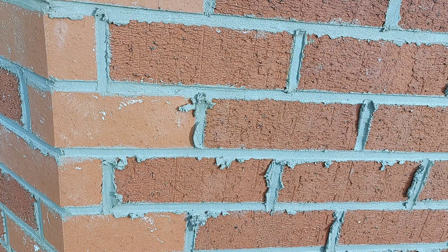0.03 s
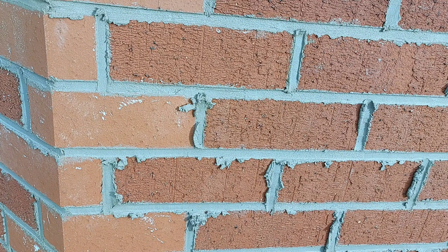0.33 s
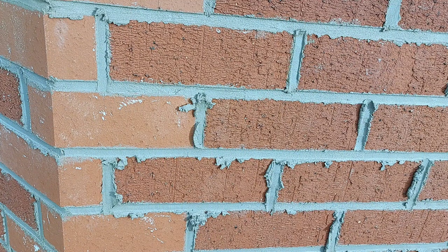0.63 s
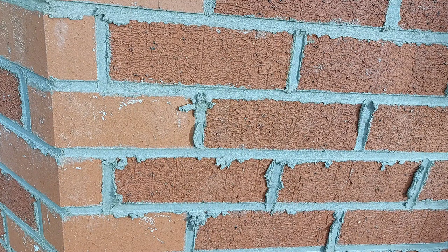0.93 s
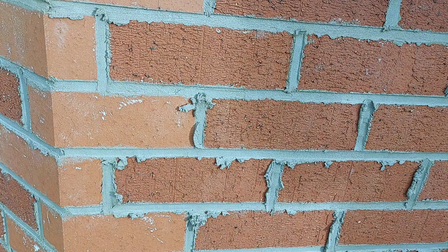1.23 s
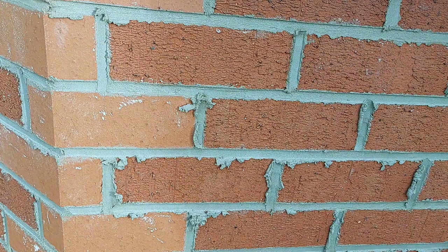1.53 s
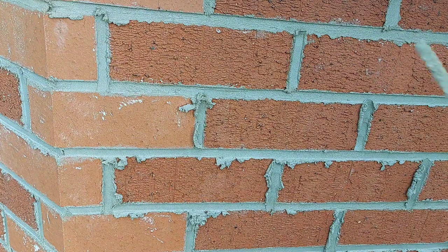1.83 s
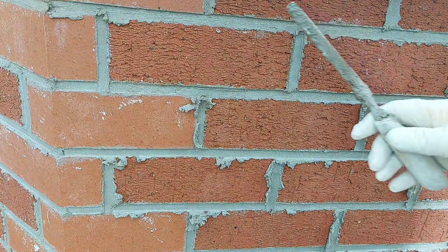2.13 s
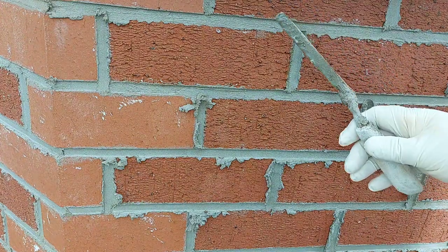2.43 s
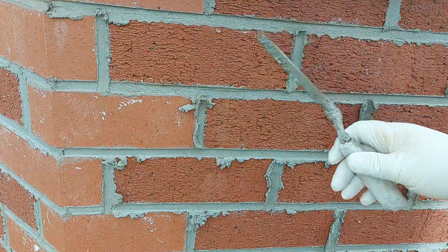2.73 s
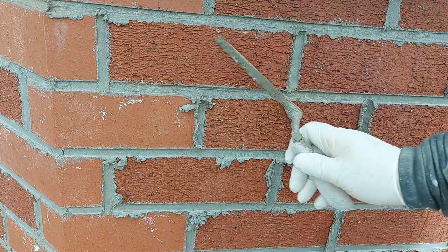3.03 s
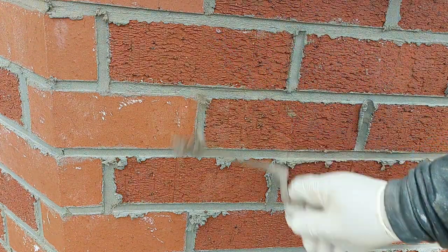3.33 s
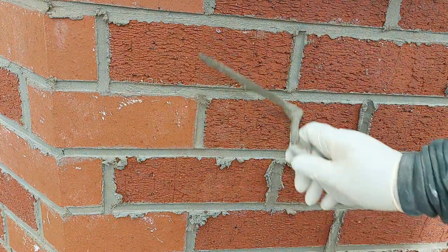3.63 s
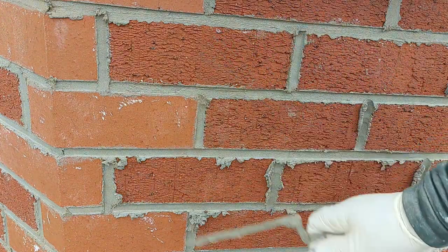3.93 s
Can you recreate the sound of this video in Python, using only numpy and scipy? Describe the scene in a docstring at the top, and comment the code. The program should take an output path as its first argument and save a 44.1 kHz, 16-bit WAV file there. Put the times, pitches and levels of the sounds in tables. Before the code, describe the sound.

Short trowel scrapes along damp mortar, then harder, ringing ones over brick.

```python
"""Outdoors at a brick wall, a steel pointing trowel works the joints, close to a hand-held camera.
Three short strokes cut through damp mortar, then two harder ones drag over brick and set the blade ringing.
Sand grains breaking under the edge make the hiss and shake the steel; bigger grains catch the tip and tick.
Soft handling bumps and faint cloth rubbing come in between, over a low rumble and a distant machine's hum."""
import sys
import numpy as np
from scipy import signal
from scipy.fft import rfft, irfft
from scipy.io import wavfile
from scipy.ndimage import map_coordinates

SR = 44100
rng = np.random.default_rng(int(sys.argv[2]) if len(sys.argv) > 2 else 0)


def pcm_store(signal):
    """Save signal as 16-bit PCM."""
    levels = np.round(np.clip(np.atleast_2d(signal), -1, 1) * 32767)
    wavfile.write(sys.argv[1], SR, levels.astype(np.int16).T)


N = 176400
TIME = np.arange(N) / SR
FREQS = np.fft.rfftfreq(N, 1 / SR)
# How much later the left microphone hears each sound
MORTAR_LAG_MS, BRICK_LAG_MS, HANDLING_LAG_MS, OUTDOOR_LAG_MS = 0.471, 0.026, .33, 0.22


def amp(db):
    """Turns decibels into a gain."""
    return 10 ** (np.asarray(db) / 20)


def unit(x):
    """Scales a signal to an average power of 1."""
    return x / np.sqrt(np.mean(x ** 2) + 1e-20)


def read(points, hz):
    """Looks up a table by frequency, on a log scale."""
    f, value = np.transpose(points)
    return np.interp(np.log(hz + 1), np.log(f + 1), value)


def level(curve, column=1):
    """One dB column of a curve as a gain over time, silent outside it."""
    rows = np.array(curve)
    return amp(np.interp(TIME, rows[:, 0], rows[:, column], left=-150, right=-150))


def colour(x, tone):
    """Shapes the lows and highs, keeping the power of white noise."""
    return irfft(rfft(x) * unit(amp(read(tone, FREQS))), N)


def wander(hz):
    """A smooth random wobble, up to about the given rate."""
    return unit(irfft(rfft(rng.standard_normal(N)) / (1 + (FREQS / hz) ** 4), N))


def solo(x):
    """Pairs a signal with silence, so stereo() sends one version to both sides."""
    return np.array([x, np.zeros(N)])


# How alike left and right are (frequency [Hz], likeness [0 to 1])
CLOSE_LIKENESS = [(30, 0.46), (250, 0.58), (600, 0.45), (1500, 0.61), (3000, 0.24), (16000, 0.2)]  # nearby sounds
ALL_ROUND_LIKENESS = [(30, 0.91), (180, 0.99), (400, 0.71), (1400, 0.47), (2500, 0.06), (16000, 0.05)]  # sounds from all round
BRICK_LIKENESS = [(300, 0.44), (4600, 0.543), (6000, 0.19)]  # steel on brick
# Which side is louder (frequency [Hz], left minus right [dB])
MAIN_BALANCE = [(30, -3), (300, -4.5), (1200, -5), (3000, -5), (5000, -6.5), (7000, -8.5), (9000, 2),
                (12500, -11), (16000, -7.5)]
BRICK_BALANCE = [(300, -4), (2000, -2), (3200, -6), (4600, -5), (7000, -3.5), (8500, 2.5), (12000, -2),
                 (16000, -0.5)]
def stereo(pair, lag_ms, likeness=CLOSE_LIKENESS, balance=MAIN_BALANCE):
    """Spreads two unrelated versions of a sound over the two microphones."""
    a, b = rfft(pair)
    same = np.clip(read(likeness, FREQS), 0, 1)
    mid, side = a * np.sqrt((1 + same) / 2), b * np.sqrt((1 - same) / 2)
    lean = amp(read(balance, FREQS) / 2)
    delay = np.exp(-2j * np.pi * FREQS * lag_ms / 1000)
    return irfft(np.array([(mid + side) * lean * delay, (mid - side) / lean]), N)


def ring(pair, notes):
    """Shakes an object so its own notes ring; a fade time is how long one takes to drop 60 dB."""
    t = np.arange(SR // 4) / SR
    body = 0
    for k, (hz, db, fade_s) in enumerate(notes):
        note = amp(-60 * t / max(fade_s, .003)) * np.sin(2 * np.pi * hz * t)
        body += (-1) ** k * amp(db) * unit(note)
    return signal.fftconvolve(pair, body[None] / np.linalg.norm(body), axes=1)[:, :N]


def grit(grains_per_s=5000, spread_db=3.5, slip_db=2, slip_hz=166):
    """Sand grains of uneven size break in clumps as the edge sticks and slips."""
    size = amp(spread_db * np.minimum(rng.exponential(1, N), 4))
    breaks = rng.random(N) < grains_per_s / SR
    clicks = rng.choice([-1., 1.], (2, N)) * size * breaks
    return unit(clicks * amp(slip_db * wander(slip_hz)))


# Tone of the rumble (frequency [Hz], relative level [dB])
RUMBLE_TONE = [(20, -47), (30, -34.5), (43, -9), (60, -6), (116, -1), (190, -10.5), (240, -8.5), (330, -21),
               (480, -28), (1060, -31.5), (1500, -38), (2100, -49), (3200, -58), (12400, -58),
               (16000, -64.5)]
# How loud the rumble and the machine are (time [s], level [dB])
RUMBLE_LEVELS = [(0, -50.5), (.3, -44), (.42, -50), (.7, -48), (1.2, -46), (2.6, -45), (3.2, -46.5),
                 (3.45, -41.5), (3.6, -43.5), (4, -42)]
MACHINE_LEVELS = [(0, -55.5), (1.4, -60), (2.4, -52), (2.8, -45.5), (3.3, -60), (3.5, -40), (3.6, -50),
                  (3.75, -41), (4, -43)]
def outdoors(hum_hz=57.7, waver_hz=2.355, throb_db=2, fade_s=0.011):
    """Low rumble and the wavering hum of a distant machine."""
    rumble = unit(colour(rng.standard_normal((2, N)), RUMBLE_TONE)) * level(RUMBLE_LEVELS)
    pitch = hum_hz + waver_hz * wander(4.27)
    hum = unit(np.sin(2 * np.pi * np.cumsum(pitch) / SR) * amp(throb_db * wander(8.7)))
    end_fades = np.minimum(np.minimum(TIME, TIME[::-1]) / fade_s, 1)
    hum *= level(MACHINE_LEVELS) * end_fades
    return stereo(rumble + solo(hum), OUTDOOR_LAG_MS, ALL_ROUND_LIKENESS)


# How long the echo lasts (frequency [Hz], fade time [s])
ECHO_FADES = [(200, 0.31), (2000, 0.21), (5000, 0.14), (14000, 0.11)]
def wall_echo(x):
    """Sound scatters briefly off the brickwork and the ground."""
    bounces = rng.choice([-1., 1.], (2, SR // 2)) * (rng.random((2, SR // 2)) < .06)
    bounces *= TIME[:SR // 2] > .004
    hz, t, spectrum = signal.stft(bounces, SR, nperseg=256)
    fade = amp(-60 * t / read(ECHO_FADES, hz)[:, None])
    tail = signal.istft(spectrum * fade, SR, nperseg=256)[1]
    return signal.fftconvolve(x, tail / np.linalg.norm(tail[0]), axes=1)[:, :N]


# Tone of sliding cloth (frequency [Hz], relative level [dB])
CLOTH_TONE = [(300, 6.5), (700, 11.5), (1500, 6), (2500, 0.5), (4500, -2), (7000, -4.5), (8500, -7.5),
              (12500, -3), (16000, -8)]
# How loud the rubbing is (time [s], level [dB])
CLOTH_LEVELS = [(0, -70.5), (.3, -62.5), (.52, -79), (.75, -58), (1.05, -67.5), (1.11, -69.5), (1.25, -67),
                (1.27, -50.5), (1.35, -58), (1.43, -58), (1.46, -51.5), (1.58, -59), (1.69, -68),
                (1.82, -61), (1.88, -56.5), (2.01, -58.5), (2.05, -56), (2.13, -69), (2.25, -61.5),
                (2.36, -70.5), (2.41, -62), (2.48, -57.5), (2.6, -68.5), (2.78, -82), (3.2, -82)]
# Quick sleeve moves (time [s], spread in time [s], centre frequency [Hz], level [dB])
SLEEVE_SWISHES = [(1.52, 0.055, 15200, -67), (1.58, 0.043, 12400, -69), (1.87, 0.015, 12500, -63),
                  (2.05, 0.014, 13400, -61)]
def rubbing(flutter_db=1.25, half_width_hz=760):
    """Sleeve and glove slide with a soft, uneven hiss; quick moves add thin, high swishes."""
    noise = rng.standard_normal((2, N)) * amp(flutter_db * wander(42))
    hiss = colour(noise, CLOTH_TONE) * level(CLOTH_LEVELS)
    for peak_s, spread_s, hz, db in SLEEVE_SWISHES:
        band = 1 / (1 + ((FREQS - hz) / half_width_hz) ** 2)
        swish = unit(irfft(rfft(rng.standard_normal((2, N))) * band, N))
        hiss += amp(db) * swish * np.exp(-((TIME - peak_s) / spread_s) ** 2 / 2)
    return stereo(hiss, HANDLING_LAG_MS, ALL_ROUND_LIKENESS)


# Single soft knocks (time [s], level [dB], final pitch [Hz], decay [s])
SOFT_KNOCKS = [(.214, -25, 187, 0.0037), (.766, -26, 178, 0.0046), (1.892, -24, 139, 0.0039),
               (2.2009, -23, 149, 0.0043), (3.299, -20, 255, 0.0033), (3.313, -24.5, 276, 0.0035),
               (3.322, -30.5, 279, 0.0025)]
def thuds(rise_s=0.0033, extra_pitch=1.32, drop_s=0.0023):
    """Each knock starts high and drops in pitch as the contact softens."""
    sound = np.zeros(N)
    for start, db, hz, decay_s in SOFT_KNOCKS:
        t = np.maximum(TIME - start, 0)
        cycles = hz * (t + extra_pitch * drop_s * (1 - np.exp(-t / drop_s)))
        shape = np.minimum(t / rise_s, 1) * np.exp(-(t / decay_s / 2) ** 2)
        sound += amp(db) * shape * np.sin(2 * np.pi * cycles)
    return stereo(solo(sound), HANDLING_LAG_MS)


# Finger moves (time [s], length [s], thump level [dB], pitch [Hz], scuff level [dB])
FINGER_BUMPS = [(0.111, 0.034, -50, 187, -45.5), (0.166, 0.024, -42, 354, -49.5),
                (1.262, 0.022, -34, 224.6, -34), (1.277, 0.0504, -32.5, 278.2, -36.5),
                (1.381, 0.011, -73, 200, -44), (1.459, .025, -59, 208, -49.5),
                (1.735, 0.056, -35.5, 180.7, -46.5), (1.745, 0.0092, -35, 687, -58.5),
                (2.237, 0.046, -41, 192, -48.5), (3.287, 0.075, -31, 103.3, -40.5)]
# Tone of a scuff (frequency [Hz], relative level [dB])
SCUFF_TONE = [(60, -18), (200, 12.5), (330, 3), (480, -4), (700, -2.5), (1150, -8.5), (1800, -17),
              (4000, -31.5), (16000, -49)]
def finger_bumps(rise_s=0.0009, fall_s=0.0085, sag=0.27, roughness=0.224):
    """Fingers shift on the camera: a short thump of sagging pitch with a scuff on top."""
    thump, scuff = np.zeros((2, N))
    uneven, jitter = amp(2.5 * wander(100)), wander(120)
    for start, length, thump_db, hz, scuff_db in FINGER_BUMPS:
        t = np.maximum(TIME - start, 0)
        shape = np.minimum(t / rise_s, 1) * np.exp(-np.maximum(t - length * 0.67, 0) / fall_s)
        progress = np.minimum(t / length / 1.39, 1)
        pitch = hz * (1 + sag * (1 - 2 * progress)) * (1 + roughness * jitter)
        thump += amp(thump_db) * shape * uneven * np.sin(2 * np.pi * np.cumsum(pitch * (t > 0)) / SR)
        scuff += amp(scuff_db) * shape
    return stereo(colour(grit() * scuff, SCUFF_TONE) + solo(thump), HANDLING_LAG_MS)


def waver(pair, depth, rate_hz):
    """Lets the pitch drift by playing a sound slightly faster and slower."""
    offset = signal.lfilter([1], [1, -np.exp(-rate_hz / SR)], depth * wander(rate_hz))
    return np.array([map_coordinates(x, [np.arange(N) + offset], order=5) for x in pair])


def steel_plate(pair, fade_s=0.012, steel_db=-1.5):
    """Part of the hiss passes through the blade, whose many close notes shift as the contact moves."""
    t = TIME[:SR // 16]
    response = unit(rng.standard_normal(len(t)) * amp(-60 * t / fade_s)) / np.sqrt(len(t))
    through = signal.fftconvolve(pair, response[None], axes=1)[:, :N]
    through = waver(through, depth=0.018, rate_hz=9)
    return (pair + amp(steel_db) * through) / np.hypot(1, amp(steel_db))


# Pings of the tip (time [s], pitch [Hz], level [dB])
TIP_PINGS = [(0.619, 1930, -46), (.942, 3020, -35.5), (3.796, 3485, -39.5)]
def clinks(fade_s=0.052):
    """The tip rings one short note as it meets or leaves an edge."""
    pings = np.zeros(N)
    for start, hz, db in TIP_PINGS:
        t = np.maximum(TIME - start, 0)
        pings += amp(db - 60 * t / fade_s) * np.sin(2 * np.pi * hz * t)
    return stereo(solo(pings), BRICK_LAG_MS, BRICK_LIKENESS, BRICK_BALANCE)


# Snags on grit (time [s], relative tick level [dB], relative ring level [dB], relative knock level [dB])
SNAGS = [(.168, -44.5, -59, -49), (.619, -62, -77, -69), (.697, -57, -70, -42), (.706, -48, -70, -42),
         (.7145, -52, -68, -41), (0.767, -52, -51, -58), (.9408, -42.5, -46.5, -29), (0.946, -60, -58, -38),
         (1.0135, -43, -50, -62), (1.029, -50, -80, -54), (3.235, -59, -56.5, -57),
         (3.269, -52.5, -52, -62), (3.283, -59, -60, -71.5), (3.352, -44.5, -33, -51.5),
         (3.3923, -35.5, -28.5, -48.5), (3.636, -52.5, -85, -66), (3.706, -42, -58, -75),
         (3.7125, -33.5, -40, -74), (3.7605, -39, -37, -54), (3.78, -43, -36, -52), (3.796, -40, -46, -56)]
# Tone of a tick (frequency [Hz], relative level [dB])
TICK_TONE = [(300, -17), (2000, 4.5), (4000, -9), (7000, 8), (9000, 0.5), (12500, 1), (16000, 5)]
# Notes of the struck blade (pitch [Hz], relative level [dB], fade time [s])
KNOCK_NOTES = [(770, -2.5, 0.0098), (1380, -2, 0.0046), (2080, -6.5, 0.0028), (2763, 0.5, 0.054),
               (3074, -12, 0.022), (3860, -9.5, 0.0067)]
FREE_BLADE_NOTES = [(974, -16, 0.17), (1252, -18.5, 0.083), (1910, -10, 0.12), (2121, -2, 0.035),
                    (2275, -9.5, 0.0577), (3130, -12, 0.07), (3238, -19, 0.083), (3360, -18, .08),
                    (3670, -12.5, 0.1), (4280, -2, 0.051), (4374, -4.5, 0.011), (4600, 3, 0.032),
                    (4830, 2, 0.016), (5870, -6.5, 0.035), (7240, -13, 0.022), (8380, -10.5, 0.0495)]  # the brick strokes ring these too
def tip_snags(blow_db=24, tick_s=0.0019):
    """The tip snags a large grain: a crack, and one blow into the blade."""
    crack, steel, knock = np.zeros((3, N))
    for start, tick_db, ring_db, knock_db in SNAGS:
        crack += 2 * amp(tick_db) * (TIME >= start) * np.exp(-abs(TIME - start) / tick_s)
        steel[round(start * SR)] = amp(ring_db + blow_db)
        knock[round(start * SR)] = amp(knock_db + blow_db)
    bright = colour(crack * rng.standard_normal((2, N)), TICK_TONE) + ring(solo(steel), FREE_BLADE_NOTES)
    dull = ring(solo(knock), KNOCK_NOTES)
    return stereo(bright, BRICK_LAG_MS, BRICK_LIKENESS, BRICK_BALANCE) + stereo(dull, MORTAR_LAG_MS)


# One curve per mortar stroke (time [s], hiss level [dB], ring level [dB], judder level [dB])
MORTAR_LEVELS = [
    [(.163, -78, -81, -68), (.169, -50, -45.5, -60), (.18, -52, -56, -47), (.212, -46, -43.5, -57),
     (.252, -47, -55.5, -53), (.268, -61, -62, -62), (.36, -92, -90, -74)],
    [(.612, -79, -78, -97), (.62, -47, -81, -40), (.636, -46, -69, -60), (.68, -44.5, -60, -48),
     (.712, -45, -57, -38), (.732, -58, -67, -72), (.76, -77, -62.5, -52.5), (.88, -90, -88, -81)],
    [(.88, -82, -69, -61), (.937, -65, -61, -63), (.943, -49, -61, -41), (.954, -51, -51, -56),
     (.975, -48, -59, -44.5), (1.008, -48, -52, -37), (1.018, -52, -65, -46), (1.032, -52, -68, -65),
     (1.042, -70, -69, -77), (1.09, -86, -92, -78)],
]
# Tone of sand in mortar (frequency [Hz], relative level [dB])
MORTAR_TONE = [(200, 1), (1000, -4), (2400, 0.5), (3500, -5.5), (5000, 1.5), (7300, 0), (8100, -4.5),
               (9500, -0.5), (12500, 2), (16000, -4.5)]
# Notes of the blade in mortar (pitch [Hz], relative level [dB], fade time [s])
MUFFLED_NOTES = [(1590, -17.5, .025), (2137, -2, 0.03), (2880, -18, .03), (3533, 0.5, 0.029),
                 (3990, 1.5, 0.0081), (4600, 1, 0.0056), (6230, -16, 0.026)]
JUDDER_NOTES = [(347.6, 7, 0.18), (695, 3, 0.074), (1086, 1, 0.01), (1485, 0, 0.027), (1587, -0.5, 0.048),
                (1800, -6.5, 0.072), (2760, -6, 0.019), (2910, -7.5, 0.13)]
def mortar_strokes():
    """Off to the right, damp mortar hisses, muffles the blade and makes it judder."""
    sand, steel, judder = (sum(level(stroke, k) for stroke in MORTAR_LEVELS) for k in (1, 2, 3))
    hiss = colour(grit() * sand, MORTAR_TONE)
    ringing = ring(grit() * steel, MUFFLED_NOTES)
    sound = steel_plate(hiss + ringing) + ring(grit() * judder, JUDDER_NOTES)
    return stereo(sound, MORTAR_LAG_MS)


# One curve per brick stroke (time [s], hiss level [dB], ring level [dB], rasp level [dB])
BRICK_LEVELS = [
    [(3.21, -83, -88, -77), (3.236, -65, -57, -69), (3.262, -65, -66, -61.5), (3.3, -47, -46, -53.5),
     (3.33, -40, -42.5, -45), (3.345, -38, -32, -31), (3.372, -36.5, -45, -39), (3.385, -35, -28, -33.5),
     (3.397, -40, -40, -38.5), (3.403, -50.5, -58, -45.5), (3.5, -87.5, -78, -87)],
    [(3.702, -92, -84, -87), (3.708, -62, -56, -60), (3.717, -46, -42, -56), (3.724, -60, -70.5, -69.5),
     (3.742, -57, -55, -68), (3.754, -44, -44, -62), (3.775, -40, -43.5, -55), (3.802, -44.5, -54, -67),
     (3.812, -69, -68, -82), (3.94, -69.5, -85, -95)],
]
# Tone of sand on brick (frequency [Hz], relative level [dB])
BRICK_TONE = [(200, 4), (1500, 1), (3000, 1.5), (5000, -3.5), (6800, 4.5), (7700, -3.5), (8400, -1.5),
              (10000, 4), (12500, 7), (16000, 1.5)]
# Notes of the pressed blade (pitch [Hz], relative level [dB], fade time [s])
RASP_NOTES = [(1914, -5.5, 0.0845), (2540, -12, 0.011), (2877, -3.5, 0.037), (3080, -2.5, 0.041),
              (3233, 0.5, 0.031), (3450, -6.5, 0.021), (4350, 0, 0.0051)]
def brick_strokes(skip_db=3, skip_hz=130):
    """Straight ahead, the blade rings as it skips over hard brick, and rasps when pressed."""
    sand, steel, rasp = (sum(level(stroke, k) for stroke in BRICK_LEVELS) for k in (1, 2, 3))
    skips = unit(amp(skip_db * np.clip(wander(skip_hz), -2, 2)))
    ringing = ring(grit() * steel * skips, FREE_BLADE_NOTES) + ring(grit() * rasp, RASP_NOTES)
    ringing = waver(ringing, depth=0.0078, rate_hz=21)  # the blade bends under the hand
    hiss = steel_plate(colour(grit() * sand * np.sqrt(skips), BRICK_TONE))
    return stereo(hiss + ringing, BRICK_LAG_MS, BRICK_LIKENESS, BRICK_BALANCE)


def scene(echo_db=-17.5):
    """The trowel with its faint echo, the handling and the background."""
    trowel = mortar_strokes() + brick_strokes() + tip_snags() + clinks()
    return trowel + amp(echo_db) * wall_echo(trowel) + finger_bumps() + thuds() + rubbing() + outdoors()


def record(dry):
    """Cuts the very highest treble, above 16100 Hz."""
    low_pass = signal.firwin(511, 16100, window=("kaiser", 9), fs=SR)
    return signal.oaconvolve(dry, low_pass[None], "same")


dry = scene()
out = record(dry)
pcm_store(out)
```